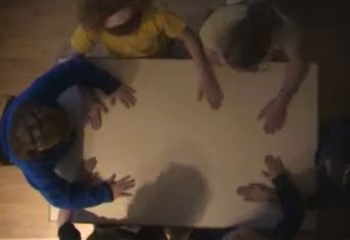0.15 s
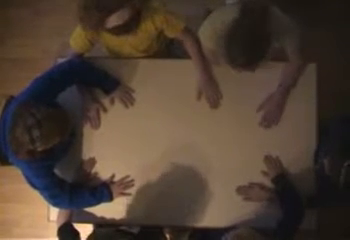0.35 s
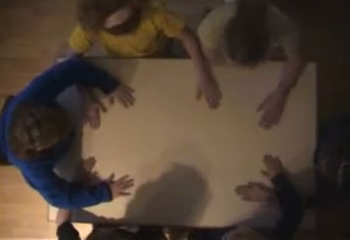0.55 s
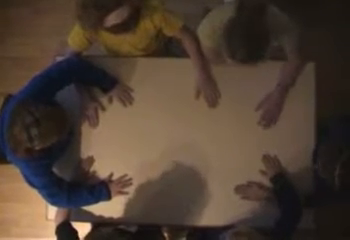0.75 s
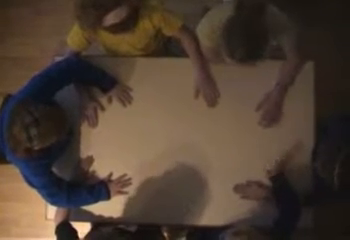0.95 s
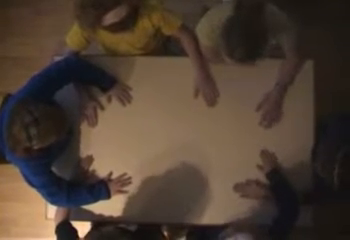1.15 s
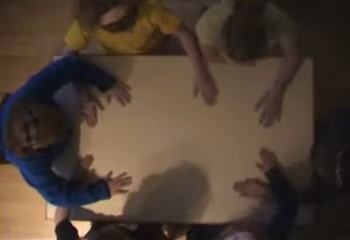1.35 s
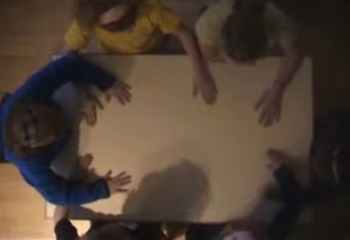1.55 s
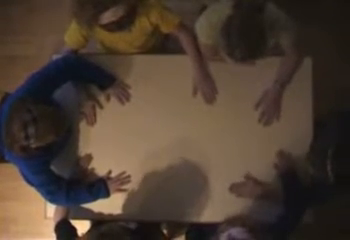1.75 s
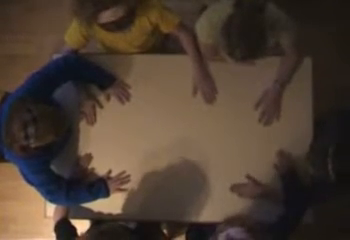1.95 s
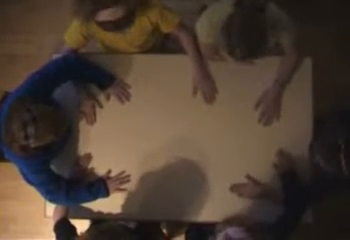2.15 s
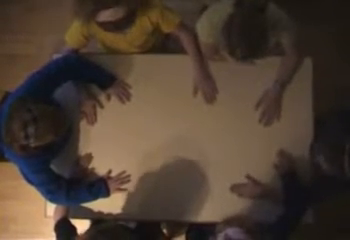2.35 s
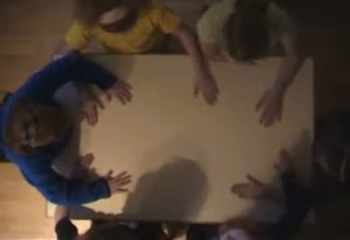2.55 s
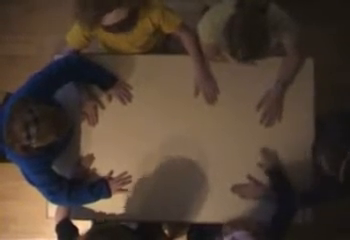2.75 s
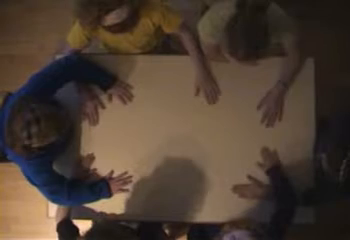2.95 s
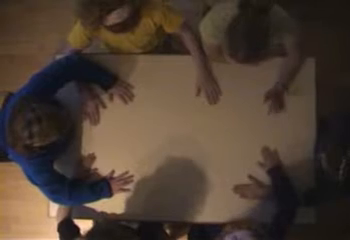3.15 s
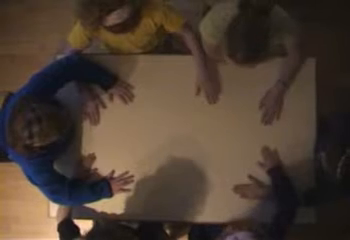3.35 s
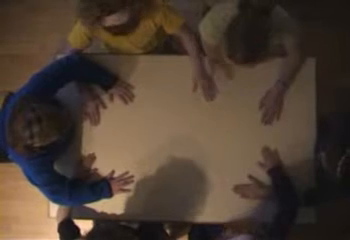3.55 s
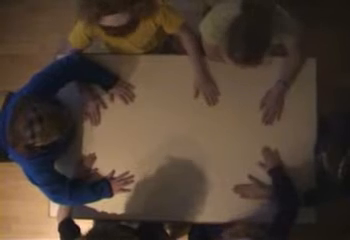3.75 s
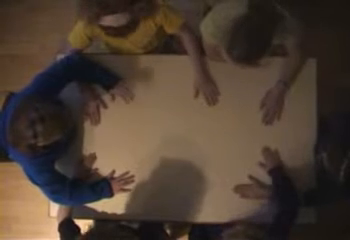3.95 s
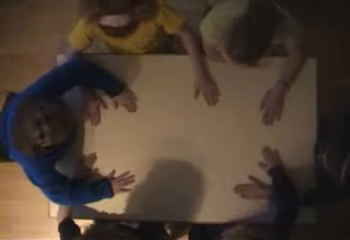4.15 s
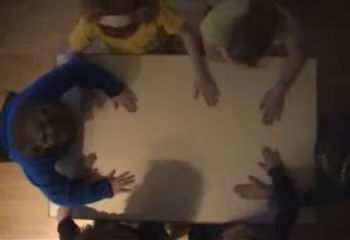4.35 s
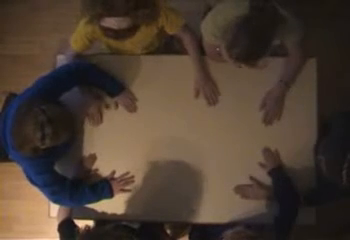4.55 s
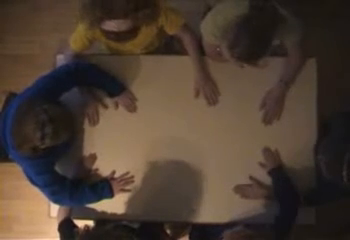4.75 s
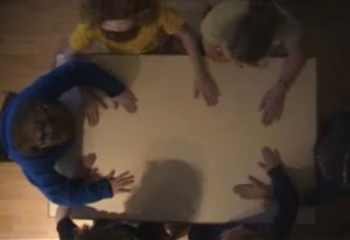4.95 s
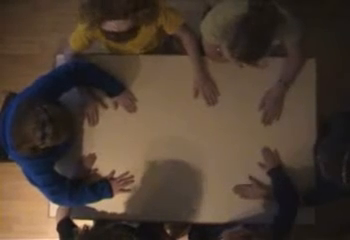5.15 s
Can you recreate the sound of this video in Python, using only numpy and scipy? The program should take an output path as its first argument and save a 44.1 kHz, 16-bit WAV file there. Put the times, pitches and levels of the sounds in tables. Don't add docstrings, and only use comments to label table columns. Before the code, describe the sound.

Palms smack a wooden table one after another at irregular gaps, with hollow board thumps and short room echo above soft camera hiss.

```python
import sys
import numpy as np
from scipy import signal
from scipy.fft import rfft, irfft
from scipy.io import wavfile
from scipy.ndimage import uniform_filter1d

SR = 44100
rng = np.random.default_rng(int(sys.argv[2]) if len(sys.argv) > 2 else 0)


def store_pcm(level_fs):
    pcm = np.round(np.clip(level_fs, -1, 1) * 32767).astype(np.int16)
    wavfile.write(sys.argv[1], SR, np.atleast_2d(pcm).T)


def boost(x):
    u = np.asarray(x, float) / 20
    return 10 ** u


N = 229394


def unit_rms(x):
    return x / np.sqrt(np.mean(x ** 2) + 1e-20)


def read_curve(points, hz):
    point_hz, value = np.transpose(points)
    return np.interp(np.log(hz + 1), np.log(point_hz + 1), value)


def add(mix, start_s, sound):
    part = mix[..., round(start_s * SR):][..., :sound.shape[-1]]
    part += sound[..., :part.shape[-1]]


def resonate(x, hz, width_hz):
    pole = np.exp((2j * hz - width_hz) * np.pi / SR)
    return 2 * signal.lfilter([1 - abs(pole)], [1, -pole], x).real


def stereo_noise(seconds, likeness, db_of, size=1024):
    frames = round(seconds * SR) * 4 // size + 2
    hz = np.fft.rfftfreq(size, 1 / SR)[:, None]
    a, b, c, d = rng.standard_normal((frames, len(hz), 4)).T
    like = np.clip(read_curve(likeness, hz), 0, 1)
    mid = np.sqrt(1 + like) * (a + 1j * b)
    side = np.sqrt(1 - like) * (c + 1j * d)
    level = boost(db_of(hz, np.arange(frames) * size / 4 / SR))
    spectrum = np.array([mid + side, mid - side]) * level
    return signal.istft(spectrum, nperseg=size, noverlap=size * 3 // 4)[1]


# hz, level_db per Hz
HISS_SPECTRUM = [(25, 15.5), (60, -38), (120, 0.5), (190, -9.5), (400, -7), (650, -14.5), (1200, -14.5),
                 (2500, -21), (4500, -22), (6600, -22), (8500, -12.5), (9800, -13), (10800, -21.5), (12300, -15)]
# hz, coherence
HISS_LIKENESS = [(60, 0.77), (180, 0.82), (550, 0.85), (1650, 0.67), (4970, 0.74), (15000, 0.28)]


def hiss():
    level_db, top_hz = -50.5, 12180

    def spectrum_db(hz, time_s):
        above_top = 0.12 * np.maximum(hz - top_hz, 0)
        return read_curve(HISS_SPECTRUM, hz) - above_top + 0 * time_s

    noise = stereo_noise(N / SR + 0.1, HISS_LIKENESS, spectrum_db)
    return boost(level_db) * unit_rms(noise[:, :N])


# shift_hz, orders
DRUM_COMBS = [
    (0, (5, 7, 8, 10, 11, 13)),
    (-91, (12, 13, 15, 17, 18)),
    (97, (11, 13, 15, 16, 17)),
    (6, (15, 16, 17)),
]
# loudest_order, level_db rms there, fall_db per order away
COMB_LEVELS = [(13, -72, .6), (16, -65, 3.5), (15.5, -70, 2.2), (16, -73, 0)]
# hz, level_db rms
MOTOR_TONES = [(3015, -77), (7634, -74), (8134, -73), (9324, -75), (9641, -75), (10454, -80), (10551, -79),
               (12301, -82)]


def whine():
    drum_hz, level_db = 570.6, -1.1
    tones = list(MOTOR_TONES)
    for (shift_hz, orders), (top, db, fall_db) in zip(DRUM_COMBS, COMB_LEVELS):
        for order in orders:
            tones.append((order * drum_hz + shift_hz, db - fall_db * abs(order - top)))
    t = np.arange(N) / SR
    out = np.zeros((2, N))
    for hz, db in tones:
        phase = 2 * np.pi * rng.random() + 0.58 * rng.standard_normal((2, 1))
        out += np.sqrt(2) * boost(db + level_db) * np.sin(2 * np.pi * hz * t + phase)
    return out


# start_s, length_s, level_db, hz, width_hz
SLEEVES = [
    (0.281, 0.23, -57.5, 2070, 2310),
    (0.991, 0.17, -58, 1270, 1530),
]


def sleeves():
    out = np.zeros(N)
    for start_s, length_s, db, hz, width_hz in SLEEVES:
        cloth = rng.standard_normal(SR)[:round(length_s * SR)]
        for width in (width_hz, width_hz, 2 * width_hz):
            cloth = resonate(cloth, hz, width)
        add(out, start_s, boost(db) * unit_rms(cloth) * np.hanning(len(cloth)))
    return out


def crack(db, hz, spread_ms, sizzle_db):
    t = np.arange(-5, 12, 1000 / SR) / spread_ms
    burst = rng.standard_normal(len(t)) * np.exp(np.minimum(t / 1.05, -t / 2.65))
    burst[np.argmin(abs(t))] = 4.5
    sizzle = resonate(resonate(burst, 8500, 4700), 8500, 4700)
    bright = resonate(resonate(burst, hz, 1800), hz, 1800)
    bright = bright + boost(sizzle_db) * sizzle + 0.85 * resonate(burst, 3200, 1400)
    return boost(db) * bright / abs(bright).max()


def skin(db, hz, sizzle_db, other_ms):
    out, lead_s = np.zeros(SR // 20), 0.006
    add(out, lead_s, crack(db, hz, 0.36, sizzle_db))
    add(out, lead_s + other_ms / 1000, crack(db - 2.5, hz * 0.81, 0.5, sizzle_db))
    return out


def ring(modes, lag_s=0, seconds=0.5):
    t = np.maximum(np.arange(round(seconds * SR)) / SR - lag_s, 0)
    sound = -sum(boost(db - 60 * t / t60) * np.sin(2 * np.pi * hz * t) for hz, db, t60 in modes)
    return sound * np.cos(np.linspace(0, np.pi / 2, len(t)))


# hz, level_db, t60_s
LOW_MODES = [(72, -19, .3), (133, 0, .15), (215, -9, .16)]
# hz, level_db, t60_s
UPPER_MODES = [(255, -6, 0.067), (335, 3, 0.07), (450, 0, 0.15), (520, 0, 0.04), (794, -9, 0.054),
               (915, -20, .06)]


def blow(thump_db, pop_db, pop_hz, pitch, knock_db):
    push = np.hanning(round(0.0016 * SR))
    place = rng.uniform(-2.32, 1, (len(UPPER_MODES), 2))
    upper = 0
    for (hz, db, t60), (share, lag) in zip(UPPER_MODES, place):
        upper = upper + ring([(hz, db + 4.7 * share, t60)], 0.00059 * (lag + 1))
    low = ring([(hz * pitch, db, t60) for hz, db, t60 in LOW_MODES])
    board = boost(thump_db) * low + boost(pop_db + knock_db) * upper
    out = np.convolve(board, push / push.sum())
    squeeze = boost(pop_db + knock_db + 13) * push
    add(out, 0, squeeze)
    add(out, 0.0013, -0.6 * squeeze)
    add(out, 0.001, ring([(pop_hz, pop_db, 0.022), (pop_hz * 1.45, pop_db - 7, 0.02)]))
    return out


# hz, t60_s
ROOM_DECAY = [(60, 0.68), (160, 0.5), (420, 0.53), (1100, 0.58), (2900, 0.62), (6000, 0.63), (12500, 0.33),
              (14500, 0.09)]
# hz, coherence
ROOM_LIKENESS = [(60, 1.0), (180, 0.98), (550, 1), (1650, 0.92), (4970, 0.88), (15000, 0.28)]
# hz, width_hz, level_db
STANDING_WAVES = [(85.5, 1.4, -10), (167, 41, -7), (235, 15, 0), (349.8, 12, 3), (466, 8.5, -8),
                  (536, 19, -12), (726, 19, -1), (770, 18, -2.5), (892, 64, -4), (1033, 27, -7.5),
                  (1163, 7.2, -15), (1396, 24, -3), (1780, 7.5, -22), (2240, 105, -6)]
# hz, width_hz
RING_BANDS = [
    (90, 140),
    (200, 150),
    (440, 442),
]
# hz, width_hz
EDGE_BANDS = [
    (2200, 2100),
    (5100, 2650),
    (9500, 5600),
]


def tail(thump_db, pop_db, pop_hz, pitch, crack_db, sizzle_db, air_shift_db, air_hz, air_width, sideways_db):
    wash = stereo_noise(1.1, ROOM_LIKENESS, lambda hz, t: -60 * t / read_curve(ROOM_DECAY, hz), size=512)
    wash = wash + sum(boost(db) * resonate(wash, hz, width) for hz, width, db in STANDING_WAVES)
    (boom_hz, boom_width), *fixed = RING_BANDS
    bands = [(boom_hz * pitch, boom_width)] + fixed + [(air_hz, air_width * air_hz)] + EDGE_BANDS
    thrown_db = crack_db + sideways_db
    follow = [(thump_db, -23, 1),
              (thump_db, -22.5, 1),
              (pop_db - air_shift_db, -11, 0.91),
              (pop_db + air_shift_db, -9.5, 1.233),
              (pop_db, -31, 0.55),
              (thrown_db, -36, 0.88),
              (thrown_db + sizzle_db, -29.5, 0.48)]
    out = 0
    for (hz, width), (cause_db, base_db, slope) in zip(bands, follow):
        band = resonate(resonate(wash, hz, 1.67 * width), hz, 1.67 * width)
        out = out + boost(base_db + slope * cause_db) * band / band[:, :SR // 10].std()
    build_s = 0.0085
    return out * (1 - np.exp(-(np.arange(wash.shape[1]) / (build_s * SR)) ** 2))


# start_s, crack_db, brightest_hz, sizzle_db, other_half_ms
CRACKS = [
    (0.508, -9.5, 4600, -3, 6),
    (1.2291, -2.5, 4100, -11, 1.7),
    (1.8661, -2.5, 3650, -8.5, -2),
    (2.0888, 1, 4770, -20, 1.4),
    (2.8185, -4.5, 5200, -1.5, 3),
    (3.3875, -12, 3560, -12.5, -1.5),
    (3.8194, -7, 4730, -8.5, -1.75),
    (4.2632, -11, 4400, -28, 3.5),
    (4.6529, -10, 3380, -12, 2.1),
    (4.9023, -16.5, 4000, -11, -2.6),
]
# start_s, thump_db, pop_db, pop_hz, board_pitch factor
BLOWS = [
    (0.5096, -22.5, -14, 1394, 1.21),
    (1.2295, -18.5, -9, 1410, 2.42),
    (1.8637, -2.5, -13, 1335, 0.98),
    (2.089, -13, -8, 944, 1.01),
    (2.8188, -20, -9.5, 1364, 1.12),
    (3.387, -15, -16.5, 1380, 1.02),
    (3.819, -3.5, -11, 770, 1.065),
    (4.2617, -8, -19, 760, 0.99),
    (4.654, -10, -16, 1103, 0.92),
    (4.9012, -21.5, -22, 1090, 0.45),
]
# air_shift_db from board body to trapped air, air_hz, relative_width, sideways_db
CUPPING = [
    (-2.5, 1000, 0.72, 1),
    (0, 1044, 0.67, -2.5),
    (1.5, 1140, 1, 2.5),
    (3.5, 848, 0.65, 1),
    (0, 1095, 0.59, -1.2),
    (1, 1116, 0.53, -.6),
    (1.5, 560, 1, -2),
    (-1, 940, 1, 3),
    (-3, 980, 0.99, -1),
    (2, 940, 0.67, -1.5),
]
# start_s, thump_db, pop_db, pop_hz, board_pitch factor
TOUCHES = [
    (.5032, -23, -15.5, 580, 0.96),
    (0.5121, -12.5, -1, 500, 1.08),
    (0.5222, -36, -9, 516, 0.78),
    (4.8955, -42, -32, 705, 0.46),
    (4.9034, -51, -16.5, 520, 1),
    (4.914, -32.5, -15, 1233, 1.8),
]
# start_s, level_db, hz, t60_s
KNOCKS = [
    (4.299, -19, 225.4, 0.41),
    (4.344, -24, 159, 0.32),
    (4.385, -17.5, 155.5, 0.14),
    (4.697, -20.5, 213, 0.24),
    (4.775, -24.5, 143.7, 0.17),
    (4.465, -33.5, 152.8, 0.43),
    (4.575, -50, 163, 1),
    (4.853, -31, 152, 0.05),
]
# delay_s, level_db
ECHOES = [(.0058, -15), (.0122, -3.5), (.0152, -10), (.0245, -11), (.0367, -14), (.049, -17)]


def slaps():
    cracks, wood, room = np.zeros(N), np.zeros(N), np.zeros((2, N))
    for hit, skin_row, palm in zip(BLOWS, CRACKS, CUPPING):
        start_s, *strike = hit
        crack_s, crack_db, hz, sizzle_db, other_ms = skin_row
        add(cracks, crack_s - 0.011, skin(crack_db, hz, sizzle_db, other_ms))
        add(wood, start_s - 0.0007, blow(*strike, -5 - palm[0]))
        add(room, start_s, tail(*strike, crack_db, sizzle_db, *palm))
    for start_s, *strike in TOUCHES:
        add(wood, start_s - 0.0007, blow(*strike, -18.5))
    for start_s, db, hz, t60 in KNOCKS:
        add(room, start_s, ring([(hz, db, t60)])[None])
    for delay_s, db in ECHOES:
        for ear in room:
            smear = np.r_[1, 0.25 * rng.standard_normal(40) * np.exp(-np.arange(40) / 15)]
            add(ear, delay_s, boost(db) * (0.49 * np.convolve(cracks, smear)[:N] + 0.61 * wood))
    treble = np.gradient(np.gradient(np.gradient(cracks)))
    aside = 0.63 * treble * np.array([[1], [-1]])
    return cracks + aside + wood + room


def scene():
    return hiss() + whine() + sleeves() + slaps()


# hz, left_minus_right_db
BALANCE = [(60, -1.5), (180, 0.5), (550, -1.5), (1650, 0), (4970, -2.5), (15000, -1.5)]
# hz, gain_db
CAPSULE = [(2500, 1), (3300, 0), (4600, 3.5), (5600, 0.5), (6600, -1.5), (8000, -1), (9200, -1.5),
           (12000, -2)]


def microphone(dry):
    hz = np.fft.rfftfreq(N, 1 / SR)
    response = boost(np.outer([0.5, -0.5], read_curve(BALANCE, hz)) + read_curve(CAPSULE, hz))
    low_edge = signal.butter(3, 64, "high", fs=SR, output="sos")
    high_edge = signal.cheby1(12, 0.5, 14000, fs=SR, output="sos")
    return signal.sosfilt(np.r_[low_edge, high_edge], irfft(rfft(dry) * response, N))


def gain_control(x):
    threshold_db, ratio, recovery_db_per_s = -29.5, 0.22, 10.8
    power = uniform_filter1d((x ** 2).mean(0), 600, origin=299)
    power_db = 10 * np.log10(abs(power) + 1e-12)
    over_db = ratio * np.maximum(power_db - threshold_db, 0)
    fall_db = np.arange(N) * recovery_db_per_s / SR
    held_db = np.maximum(np.maximum.accumulate(over_db + fall_db) - fall_db, 0)
    return 1.029 * np.tanh(x / boost(held_db) / 0.87)


def roll_off(x):
    return signal.sosfilt(signal.butter(12, 15610, fs=SR, output="sos"), x)


def record(dry):
    mix = gain_control(microphone(dry))
    return roll_off(mix)


dry = scene()
out = record(dry)
store_pcm(out)
```